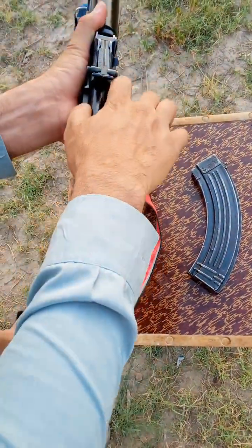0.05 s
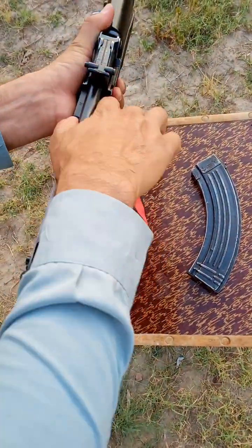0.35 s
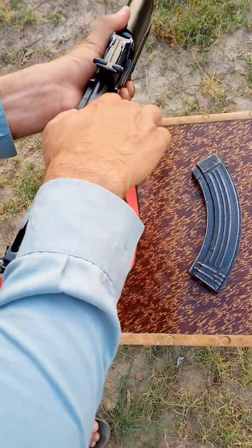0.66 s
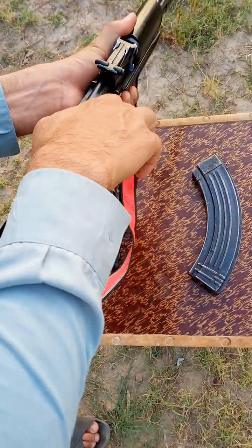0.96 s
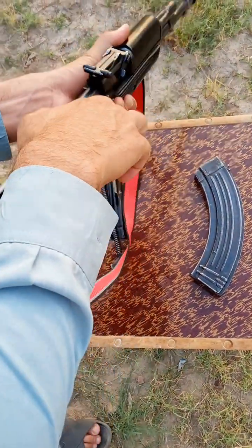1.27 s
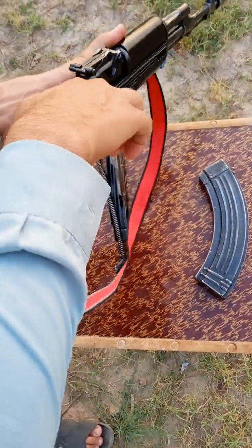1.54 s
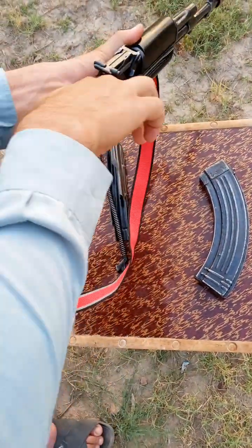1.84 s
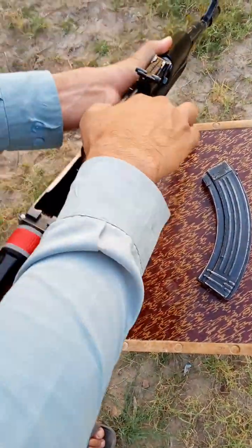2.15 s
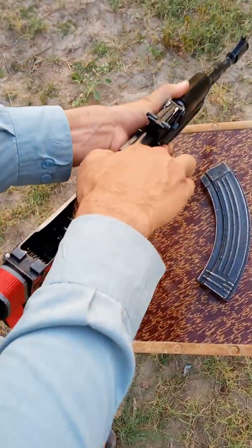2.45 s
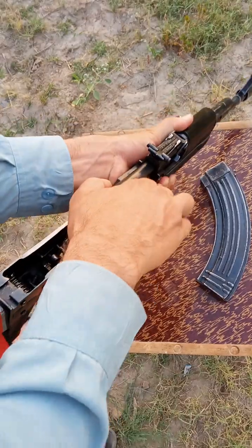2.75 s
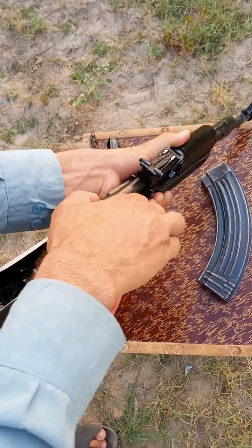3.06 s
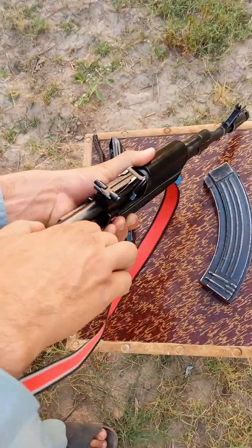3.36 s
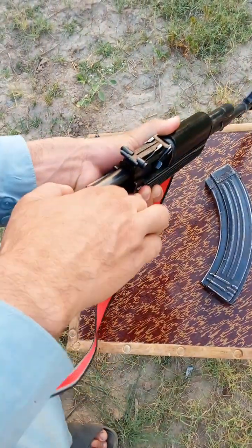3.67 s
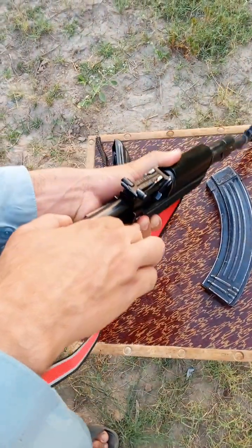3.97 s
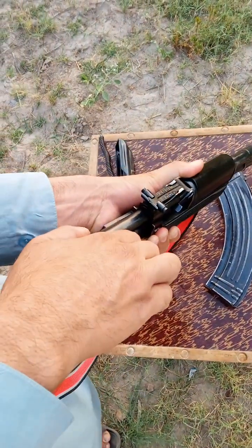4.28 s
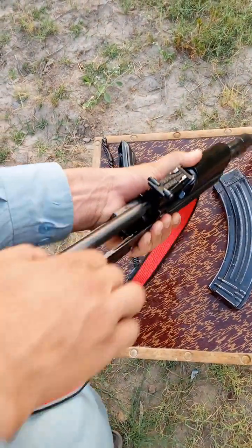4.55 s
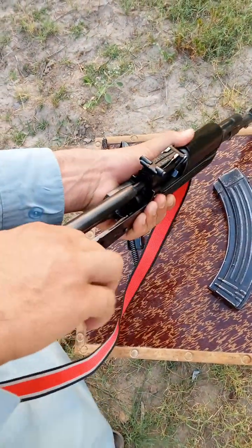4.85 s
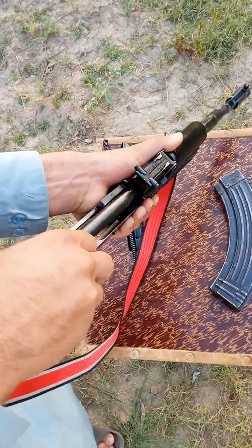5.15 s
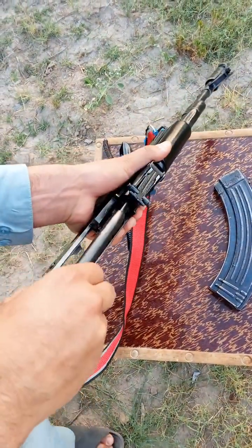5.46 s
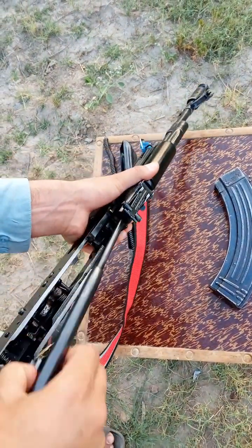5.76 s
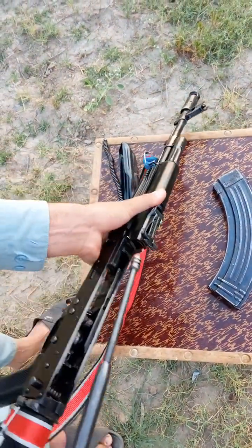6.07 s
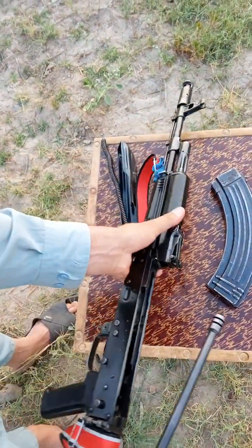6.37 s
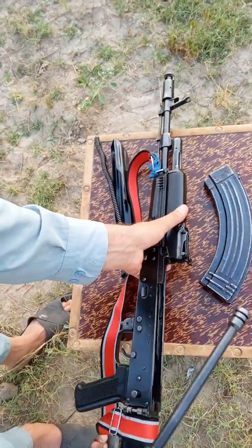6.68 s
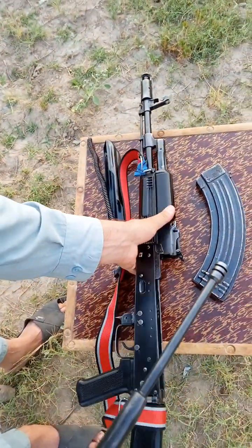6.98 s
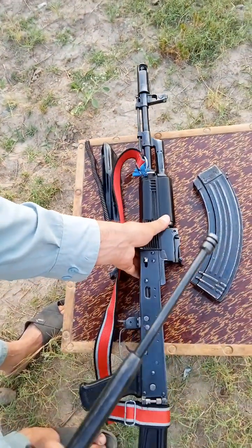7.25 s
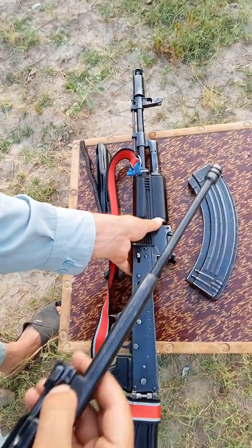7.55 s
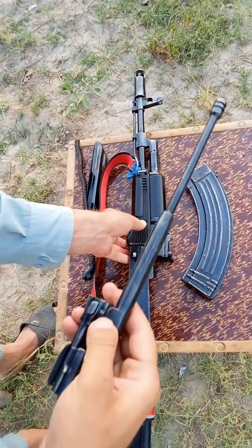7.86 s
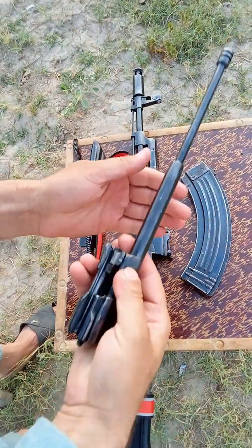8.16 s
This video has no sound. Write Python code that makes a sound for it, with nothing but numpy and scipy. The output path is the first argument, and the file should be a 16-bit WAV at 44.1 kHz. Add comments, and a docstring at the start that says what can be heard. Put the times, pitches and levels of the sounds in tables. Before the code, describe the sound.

A rifle is taken apart by hand outdoors, close to the microphone. Scattered steel clicks mix with dull handling thuds and faint sleeve rustle. About halfway comes a burst of sharp clicks and knocks, then the bolt carrier scrapes out along its rails with a thin squeak. The rifle clatters onto a cloth-covered wooden table and drags briefly with a groan and a rasp, over a faint low rumble.

```python
"""A rifle is field-stripped on a cloth-covered wooden table, over a low outdoor rumble.
First steel parts click, sleeves rustle and dull handling bumps thud. Near 4.5 s come sharp clicks
and knocks; from 5.4 s the bolt carrier scrapes out along its rails, its piston rod squeaking.
After 7 s the rifle clatters down and drags: the boards groan, a steel edge rasps and squeals.
Last, the rod squeaks faintly as it is turned in the hand."""
import sys
import numpy as np
from scipy import signal
from scipy.fft import rfft, irfft, next_fast_len
from scipy.io import wavfile
from scipy.ndimage import map_coordinates

SR = 44100
rng = np.random.default_rng(int(sys.argv[2]) if len(sys.argv) > 2 else 0)


def master(y):
    """Save y as 16-bit WAV."""
    cut = np.clip(np.atleast_2d(y).T, -1, 1)
    pcm = np.round(cut * 32767)  # scale
    wavfile.write(sys.argv[1], SR, pcm.astype(np.int16))


N = 371189
HIT_TIME_S = np.arange(int(.4 * SR)) / SR
GRAZE_S = .007  # parts graze this long before a blow

# Spectra of steel crack, its high glint, piston rod and boards. Each row: frequency in Hz, level in dB.
CRACK_SPECTRUM = [(150, -49.5), (380, -12.5), (520, -7.5), (750, -13), (1150, -2.5), (1750, -3),
                  (2750, -3.5), (3300, -13.5), (5600, -34), (15000, -57)]
GLINT_SPECTRUM = [(4000, -45), (7000, -30), (9500, -16), (11000, -10), (13200, -2.5), (15500, -25.5)]
ROD_SPECTRUM = [(2500, -31), (3700, 0), (4500, 0.5), (5000, -2), (5700, -21.5), (9000, -28)]
WOOD_SPECTRUM = [(40, -26.5), (90, 0.5), (200, -2.5), (320, -1.5), (400, -9), (540, -1.5), (690, -11),
                 (1100, -10), (2400, -15), (3300, -21), (4700, -22.5), (5800, -34), (14000, -38.5)]
# Modes of the rifle lying on the boards. Each row: frequency in Hz, level in dB, T60 in seconds.
RIFLE_MODES = [(157, -9.5, 0.21), (194.7, -3, 0.46), (244, -4.5, 0.31), (294.6, -2.5, 0.21),
               (491.3, 3.5, 0.2), (543.5, 8.5, 0.093), (796, -1.5, 0.12), (1020, -18.5, 0.24),
               (1213, -11, 0.24), (1380, -15.5, 0.15), (1763, -17, 0.18), (2180, -15, 0.05)]


def amp(db):
    """Decibels to gain."""
    return 10 ** (np.asarray(db) / 20)


def unit(x):
    """Scale to rms 1."""
    return x / np.sqrt(np.mean(x ** 2) + 1e-20)


def fade(t60_s):
    """Exponential decay, one hit long."""
    return np.exp(-np.log(1000) * HIT_TIME_S / max(t60_s, 1e-3))


def wobble(rate_hz):
    """Smooth random curve, rate_hz knots a second."""
    knots = rng.standard_normal(int(N * rate_hz / SR) + 4)
    return map_coordinates(knots, [np.arange(N) * rate_hz / SR])


def add(track, start_s, sound):
    """Mix a sound in at start_s."""
    part = track[round(start_s * SR):][:len(sound)]
    part += sound[:len(part)]


def through(force, response):
    """Pass a force through a response."""
    return signal.fftconvolve(force, response)[:len(force)]


def strokes(rows, attack_s, release_s):
    """Rise-hold-decay gains, one per level column. Each row: start and length in seconds, levels in dB."""
    start_s, length_s, *levels_db = np.transpose(rows)
    t = np.arange(N) / SR - start_s[:, None]
    shapes = np.clip(t / attack_s, 0, 1) * np.exp(-np.maximum(t - length_s[:, None], 0) / release_s)
    return [amp(db) @ shapes for db in levels_db]


def colour(spectrum, cutoff_hz=SR, spot_hz=SR, spot_db=0):
    """Unit-energy response: a spectrum dulled by soft contact, with a resonance set by the spot struck."""
    size = 8192
    hz = np.fft.rfftfreq(size, 1 / SR) + 1
    knot_hz, knot_db = np.transpose(spectrum)
    base_db = np.interp(np.log(hz), np.log(knot_hz), knot_db)
    resonance_db = spot_db / (1 + ((hz - spot_hz) / (40 + 0.049 * spot_hz)) ** 2)
    gain = amp(base_db + resonance_db) / np.hypot(1, (hz / cutoff_hz) ** 2)
    # minimum phase: all ringing follows the blow
    cepstrum = irfft(np.log(gain / gain.max() + 1e-6))
    cepstrum[1:size // 2] *= 2
    cepstrum[size // 2 + 1:] = 0
    response = irfft(np.exp(rfft(cepstrum)))
    return response / np.linalg.norm(response)


def ring(modes, scatter_db, cutoff_hz=SR):
    """Decaying modes at random strengths and phases, starting near rms 1."""
    hz, db, t60_s = np.transpose(modes)
    gain = amp(db + scatter_db * rng.standard_normal(len(hz))) / np.hypot(1, (hz / cutoff_hz) ** 2)
    cycles = hz[:, None] * HIT_TIME_S + rng.random((len(hz), 1))
    waves = np.sin(2 * np.pi * cycles) * [fade(t) for t in t60_s]
    return gain @ waves / np.linalg.norm(gain) * np.sqrt(2) * (1 - fade(0.0059))


def contact(response, t60_s, snap, graze_db=-20, strike=0):
    """Parts graze, meet in a short blow, then chatter away; energy of a decay from rms 1."""
    blow = fade(t60_s) * (1 + snap * fade(0.0074))
    graze = amp(graze_db) * np.linspace(0, 1, round(GRAZE_S * SR))
    force = rng.standard_normal(len(blow)) * np.concatenate([graze, blow])[:len(blow)]
    force[len(graze)] += strike * np.linalg.norm(force)  # clean impulse of hard parts
    return unit(through(force, response)) * np.sqrt(np.mean(fade(t60_s) ** 2))


def friction(response, slip_hz, rough_db):
    """Stick-slip noise through a response, rms 1."""
    grip = amp(rough_db * np.tanh(2 * wobble(slip_hz)))
    return unit(through(rng.standard_normal(N) * grip, response))


def outdoors(rumble_db=-59.5, air_db=-75):
    """Low rumble in soft lumps under an even hush of air."""
    # Each row: frequency in Hz, level in dB.
    rumble_spectrum = [(20, -29.5), (34, -10.5), (53, 2), (75, 2.5), (115, 1.5), (165, -11.5), (300, -18.5),
                       (600, -34.5), (1200, -79.5)]
    air_spectrum = [(180, -26), (300, -8), (550, -10), (900, -12), (1500, -15.5), (2600, -16.5),
                    (3900, -24), (6400, -43), (10000, -45.5), (13300, -42), (15500, -49.5)]
    rumble = unit(through(rng.standard_normal(N), colour(rumble_spectrum)))
    air = unit(through(rng.standard_normal(N), colour(air_spectrum)))
    lumps = unit(amp(4.4 * np.tanh(wobble(16))))
    return amp(rumble_db) * lumps * rumble + amp(air_db) * air


def sleeves():
    """Sleeves and sling brush the stock as the hands shift."""
    # Each row: start in seconds, length in seconds, level in dB.
    rustles = [(0.85, 0.27, -71.5), (1.2, .12, -55.5), (3.58, 0.29, -66), (5.03, 0.54, -77),
               (6.7, 0.14, -69.5)]
    # Each row: frequency in Hz, level in dB.
    cloth_spectrum = [(70, -12.5), (130, -1.5), (230, 2), (450, -14), (900, -21.5), (2000, -33.5),
                      (5000, -60)]
    effort, = strokes(rustles, attack_s=.08, release_s=0.059)
    return effort * friction(colour(cloth_spectrum), slip_hz=55, rough_db=3.0)


def low_thuds(glide_hz=330, firm_rise_s=0.004, tap_rise_s=0.00043, noise_db=-27, tap_db=-13):
    """Dull, low handling bumps close to the microphone; the firm ones glide down in pitch."""
    # Each row: start in seconds, level in dB, settled pitch in Hz, decay in seconds, rise in seconds.
    thuds = [(1.235, -28, 94, 0.023, 0.021), (1.2913, -30.5, 120, 0.005, 0.00041),
             (1.3283, -9.5, 94.5, 0.017, 0.0017), (1.349, -28.5, 84, 0.022, 0.0072),
             (2.145, -27, 86.6, 0.025, 0.0046), (2.189, -36, 92.3, 0.037, 0.0051),
             (3.075, -45.5, 100, 0.031, 0.01), (3.547, -44, 86, 0.013, 0.0061),
             (4.03, -42.5, 104, 0.017, 0.0053), (4.214, -31, 69, 0.041, 0.00026),
             (4.273, -41.5, 98.5, 0.035, 0.0026), (4.4944, -22, 423, 0.003, 0.00098),
             (6.737, -42, 70, 0.014, 0.0039), (7.075, -31.5, 66.3, 0.028, 0.0029),
             (7.224, -29.5, 70, 0.054, 0.0097), (7.643, -43, 92.4, 0.064, 0.012),
             (7.7955, -30, 133, 0.024, 0.0017)]
    dull = colour(WOOD_SPECTRUM, cutoff_hz=190)
    hollow = colour(WOOD_SPECTRUM, cutoff_hz=720, spot_hz=775, spot_db=13.5)
    out = np.zeros(N)
    for start_s, db, hz, decay_s, rise_s in thuds:
        firm = 1 / (1 + (rise_s / firm_rise_s) ** 2)
        sudden = 1 / (1 + (rise_s / tap_rise_s) ** 2)
        glide_s = 0.11 * decay_s
        cycles = hz * HIT_TIME_S + firm * glide_hz * glide_s * (1 - np.exp(-HIT_TIME_S / glide_s))
        swell = (1 - np.exp(-HIT_TIME_S / rise_s)) * np.exp(-(HIT_TIME_S / decay_s) ** 2)
        add(out, start_s, amp(db) * swell * np.sin(2 * np.pi * cycles))
        low_noise = amp(noise_db) * contact(dull, t60_s=0.089, snap=0.91)
        tap = amp(tap_db) * sudden * contact(hollow, t60_s=0.04, snap=0.66)
        add(out, start_s - GRAZE_S, amp(db) * (low_noise + tap))
    return out


def edge_scrape(sheet_t60_s=.075, rod_db=-13, glint_db=-27, squeal_hz=3290, squeal_db=-72):
    """A steel edge bites, rasps and wakes the receiver's sheet overtones; it ends in a thin squeal."""
    # Each row: start in seconds, length in seconds, level in dB.
    bites = [(7.665, .015, -68.5), (7.778, .012, -65), (7.803, 0.02, -63.5), (7.835, 0.016, -59),
             (7.865, 0.059, -73)]
    # Each row: frequency in Hz, level in dB.
    overtones = [(2240, 2.5), (2630, -5.5), (3005, -5), (3275, -12), (3490, -12), (3865, -11), (4570, -15),
                 (5370, -25), (6080, -28), (7000, -31), (7720, -34), (8560, -27.5), (11590, -30),
                 (13100, -30), (13650, -29)]
    rasp = amp(rod_db) * colour(ROD_SPECTRUM) + amp(glint_db) * colour(GLINT_SPECTRUM)
    out = np.zeros(N)
    for row in bites:
        bite, = strokes([row], attack_s=0.0043, release_s=.018)
        steel = ring([(hz, db, sheet_t60_s) for hz, db in overtones], scatter_db=2.5)
        steel /= np.linalg.norm(steel)
        add(steel, 0, rasp)
        out += bite * friction(steel, slip_hz=250, rough_db=8.0)
    squeal, = strokes([(7.858, 0.048, squeal_db)], attack_s=.015, release_s=.01)
    cycles = np.cumsum(squeal_hz * (1 + 0.0046 * wobble(150))) / SR
    return out + squeal * unit(np.sin(2 * np.pi * cycles))


def rifle_drag(ring_db=-1, grit_db=-5, groan_hz=194, waver=0.089):
    """The rifle judders over the table, exciting its upper modes; stick-slip makes the board groan."""
    # Each row: start in seconds, length in seconds, rubbing level in dB, groan level in dB.
    pushes = [(7.605, 0.087, -58, -67), (7.735, .16, -47.5, -44), (7.835, 0.05, -54.5, -54),
              (7.955, 0.033, -63, -50.5)]
    rub, groan = strokes(pushes, attack_s=0.013, release_s=0.025)
    singing = amp(ring_db) * friction(ring(RIFLE_MODES[4:], scatter_db=3.5), slip_hz=120, rough_db=5.0)
    grit = amp(grit_db) * friction(colour(WOOD_SPECTRUM, cutoff_hz=1480), slip_hz=300, rough_db=6.0)
    slips = np.cumsum(groan_hz * (1 + waver * wobble(70))) / SR
    board = unit(np.sin(2 * np.pi * slips) * amp(2.9 * wobble(80)))
    return rub * (singing + grit) + groan * board


def rifle_knocks(rattle_db=-6.0, ring_db=-15, firm_hz=990):
    """The rifle hits the boards; firmer contacts reach more modes and shake loose parts for longer."""
    # Each row: start in seconds, level in dB, contact cutoff in Hz, resonance in Hz.
    knocks = [(2.147, -39, 480, 310), (4.484, -26.5, 200, 90), (4.494, -22.5, 945, 648),
              (4.5243, -27.5, 1400, 500), (4.5537, -28, 1710, 560), (4.7333, -39.5, 2020, 494),
              (7.0745, -45.5, 610, 603), (7.217, -40.5, 550, 300), (7.2635, -25, 400, 200),
              (7.2647, -34, 1410, 1300), (7.304, -38, 1320, 220), (7.654, -39.5, 550, 536),
              (7.734, -25.5, 483, 553), (7.777, -31, 1720, 266), (7.796, -29, 1490, 368),
              (7.831, -27.5, 1750, 540)]
    out = np.zeros(N)
    for start_s, db, cutoff_hz, spot_hz in knocks:
        t60_s = 0.084 * (cutoff_hz / firm_hz) ** 0.45
        wood = colour(WOOD_SPECTRUM, cutoff_hz, spot_hz, spot_db=12.5)
        rattle = contact(wood, t60_s, snap=1.0, graze_db=-17.5)
        add(out, start_s - GRAZE_S, amp(db + rattle_db) * rattle)
        add(out, start_s, amp(db + ring_db) * ring(RIFLE_MODES, scatter_db=3.5, cutoff_hz=cutoff_hz))
    return out


def carrier_slide(bind_s=5.465, bind_width_s=0.087, bind_db=10.5, burrs_per_s=70):
    """The carrier binds, then runs freely on its rails, catching on burrs; its rod squeaks in fits."""
    # Each row: frequency in Hz, level in dB.
    rail_spectrum = [(300, -17.5), (540, 6.5), (750, -15), (1200, 1.5), (1450, -9), (1720, 8.5),
                     (2000, -10), (2600, -12), (3400, -17), (6000, -47)]
    squeak_spectrum = [(3000, -40), (4150, 5), (4480, 11), (4950, -19), (5500, -47)]
    # Each row: start in seconds, length in seconds, level in dB.
    squeaks = [(5.4, 0.52, -86), (5.73, 0.21, -81), (5.92, 0.032, -71.5), (8.365, 0.022, -80)]
    pull, = strokes([(5.39, 0.56, -74.5)], attack_s=0.026, release_s=0.018)
    rub = pull * amp(bind_db * np.exp(-((np.arange(N) / SR - bind_s) / bind_width_s) ** 2))
    squeak, = strokes(squeaks, attack_s=0.012, release_s=0.018)
    burrs = (rng.random(N) < burrs_per_s / SR) * amp(1.6 * rng.standard_normal(N))
    grip = through(burrs, fade(0.034))
    ticks = unit(through(grip * rng.standard_normal(N), colour(CRACK_SPECTRUM)))
    rails = friction(colour(rail_spectrum), slip_hz=200, rough_db=2.5)
    rod = friction(colour(squeak_spectrum), slip_hz=90, rough_db=8)
    return rub * (rails + amp(-3) * ticks) + amp(-4) * squeak * rod


def carrier_jerks(t60_s=0.021, rod_db=-17):
    """Each jerk over a burr gives one dry tick in rails and rod."""
    # Each row: start in seconds, level in dB.
    jerks = [(5.408, -50.5), (5.427, -59), (5.448, -55.5), (5.4652, -46.5), (5.506, -58), (5.531, -63),
             (5.791, -61)]
    steel = colour(CRACK_SPECTRUM, cutoff_hz=2700, spot_hz=1740, spot_db=15.5)
    out = np.zeros(N)
    for start_s, db in jerks:
        rail = contact(steel, t60_s, snap=.3, graze_db=-11)
        rod = contact(colour(ROD_SPECTRUM), t60_s, snap=.3)
        add(out, start_s - GRAZE_S, amp(db) * (rail + amp(rod_db) * rod))
    return out


def click(db, bright_db, spot_hz, crack_db=-6.0, rod_db=-27.0, glint_db=-46.5):
    """One steel contact: a crack, the thin ring of the rod, and a glint that grows with brightness."""
    t60_s = 0.044 * np.exp(0.0137 * (db + 43))  # louder clicks chatter longer
    cutoff_hz = 3300 * np.exp(0.3 * bright_db)
    steel = colour(CRACK_SPECTRUM, cutoff_hz, spot_hz, spot_db=12.5)
    crack = amp(crack_db) * contact(steel, t60_s, snap=0.22, graze_db=-11, strike=.3)
    rod = amp(rod_db + bright_db) * contact(colour(ROD_SPECTRUM), t60_s, snap=0.61, strike=0.25)
    glint = amp(glint_db + 1.6 * bright_db) * contact(colour(GLINT_SPECTRUM), t60_s, snap=0.66)
    return amp(db) * (crack + rod + glint)


def carrier_clicks(rebound_s=.012, ring_db=-17.5):
    """Loose steel parts meet, spring back and land again, duller; the hands damp their ringing."""
    # Each row: start in seconds, level in dB, brightness in dB, resonance in Hz, rebound gain in dB.
    clicks = [(0.0877, -54.5, -3, 2120, -24), (0.2453, -46.5, 12, 2680, 1), (0.2509, -35.5, 0.5, 1690, -25),
              (0.8608, -52, -2.5, 1860, -5.5), (1.2446, -52.5, 0.5, 1260, -9),
              (1.3221, -43, 11.5, 1860, 0.5), (1.4857, -49.5, 5, 2370, -4), (1.4967, -39, 1, 2830, -9),
              (1.5038, -41, 9.5, 1720, 0), (1.988, -46.5, -0.5, 1220, -5.5),
              (2.0364, -49, 11.5, 1730, -14.5), (2.0434, -37, 3.5, 1790, -17),
              (2.0732, -47.5, 1.5, 1250, -1), (2.2402, -46, -4, 1240, -5.5),
              (2.3072, -51.5, -3.5, 1250, -9), (4.4506, -30, 13.5, 2500, -7), (4.5016, -35, 5, 1024, -7),
              (4.526, -33, 8, 1690, -8), (4.5536, -34.5, -0.5, 1170, -3), (4.609, -48, 2, 1740, -10),
              (4.6474, -40.5, 3, 1590, -22), (4.7156, -48, -6.5, 1640, -1.5),
              (4.7335, -33.5, 2.5, 1280, -26), (4.909, -54, -3.5, 2680, -3.5), (5.04, -51, -9.5, 1210, -12),
              (5.333, -41.5, -3, 1910, -22), (5.338, -42, 3, 1230, -22), (5.4803, -42, 3.5, 1730, -12),
              (5.8121, -48, -2.5, 2210, -14), (5.8394, -50, -3, 1250, -20), (5.896, -45.5, 5.5, 1990, -25),
              (5.9275, -50, 0, 2020, -3)]
    # Receiver and carrier. Each row: frequency in Hz, level in dB, T60 in seconds.
    steel_modes = [(500, -11, 0.18), (1003, -5, 0.065), (1230, -7.5, 0.053), (1570, -2, .04),
                   (1720, -1.5, 0.095), (1975, 3.5, 0.052), (2820, -19, 0.035), (4520, -5.5, 0.03),
                   (4780, -11, 0.017)]
    out = np.zeros(N)
    for start_s, db, bright_db, spot_hz, rebound_db in clicks:
        add(out, start_s - GRAZE_S, click(db, bright_db, spot_hz))
        rebound = click(db + rebound_db, bright_db - 2, spot_hz * 0.936)
        add(out, start_s - GRAZE_S + rebound_s, rebound)
        add(out, start_s, amp(db + ring_db) * ring(steel_modes, scatter_db=7.5))
    return out


def scene(scatter_db=-18):
    """Close, dry mono mix with faint scatter from ground and table."""
    handling = carrier_clicks() + rifle_knocks() + carrier_slide() + carrier_jerks()
    handling += rifle_drag() + edge_scrape()
    tail = rng.standard_normal(len(HIT_TIME_S)) * fade(0.25) * (1 - fade(0.029))
    scatter = amp(scatter_db) * through(handling, tail / np.linalg.norm(tail))
    return (handling + scatter + low_thuds() + sleeves() + outdoors())[None]


def record(dry, top_hz=15500):
    """Brick-wall low-pass."""
    size = next_fast_len(N + SR // 2)
    passband = np.fft.rfftfreq(size, 1 / SR) < top_hz
    return irfft(rfft(dry, size) * passband, size)[:, :N]


dry = scene()
out = record(dry)
master(out)
```